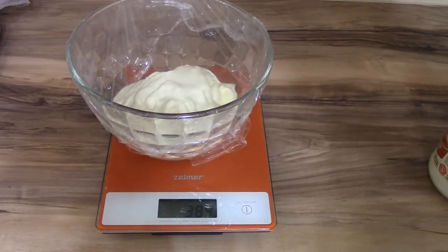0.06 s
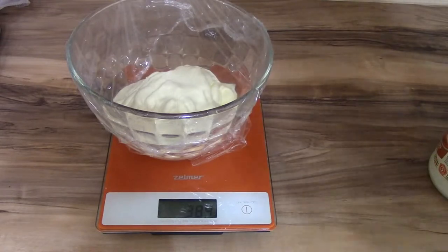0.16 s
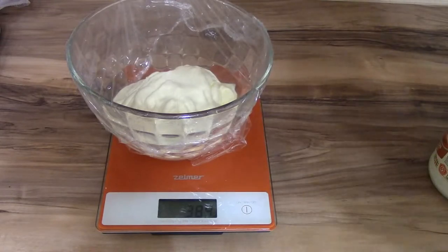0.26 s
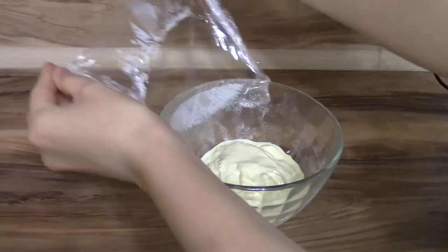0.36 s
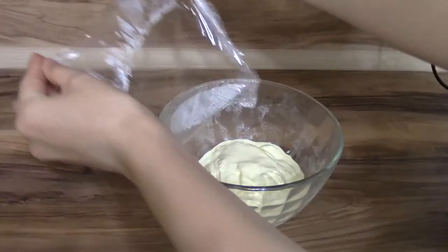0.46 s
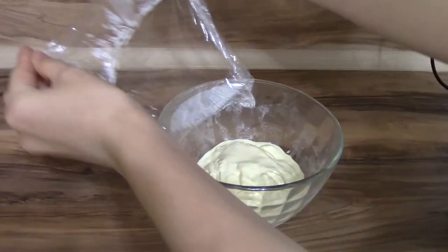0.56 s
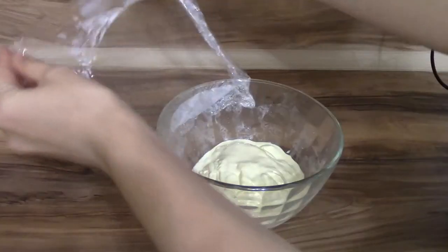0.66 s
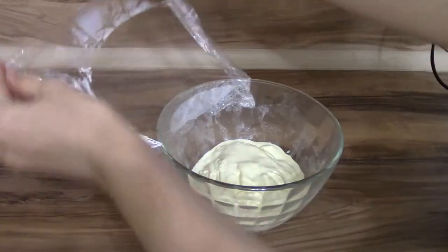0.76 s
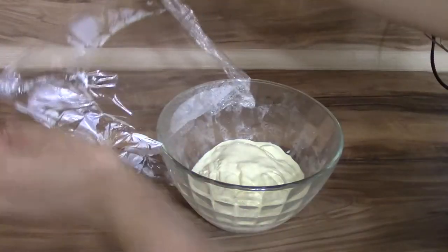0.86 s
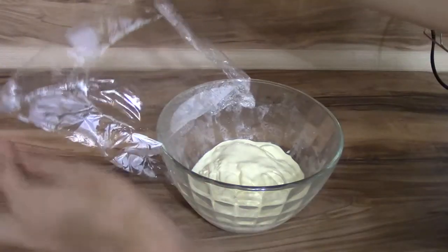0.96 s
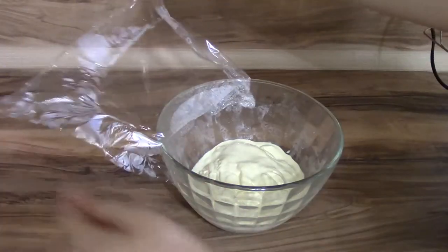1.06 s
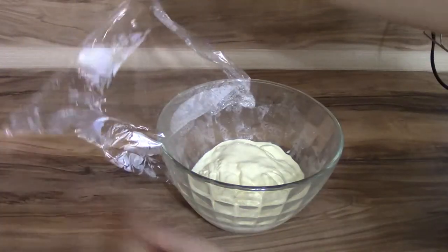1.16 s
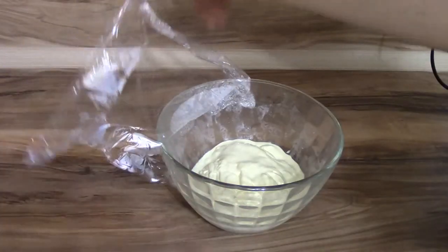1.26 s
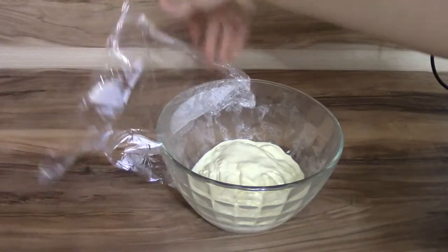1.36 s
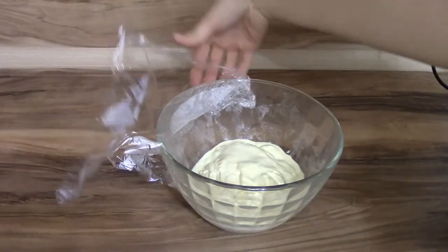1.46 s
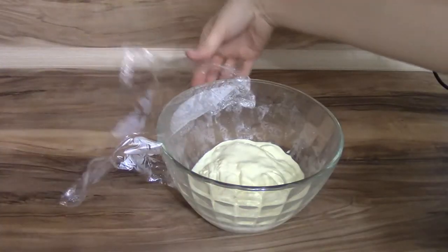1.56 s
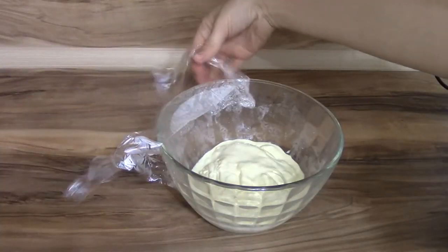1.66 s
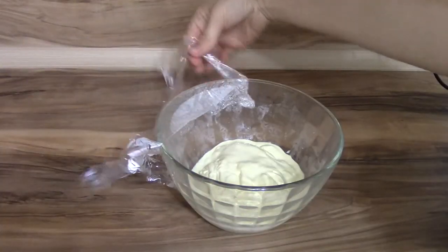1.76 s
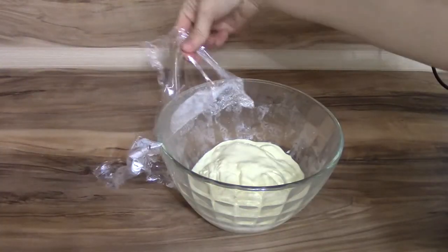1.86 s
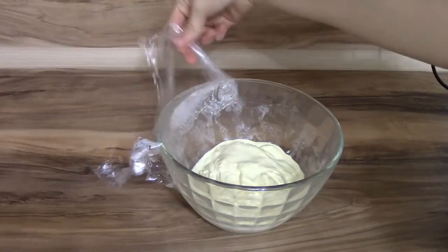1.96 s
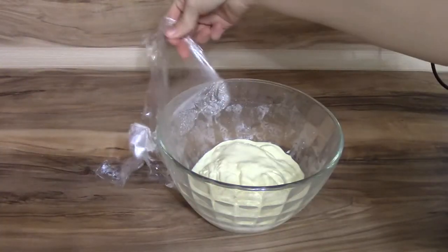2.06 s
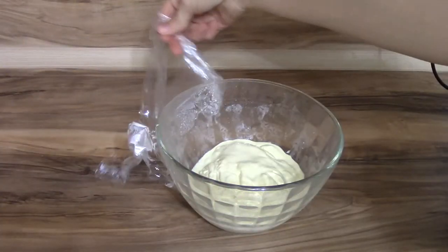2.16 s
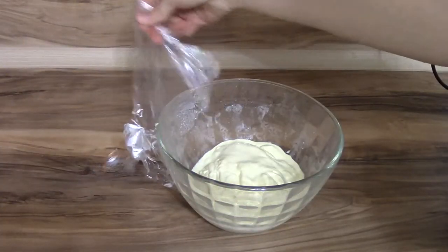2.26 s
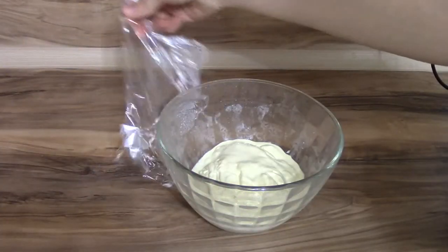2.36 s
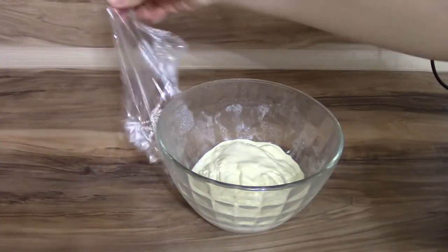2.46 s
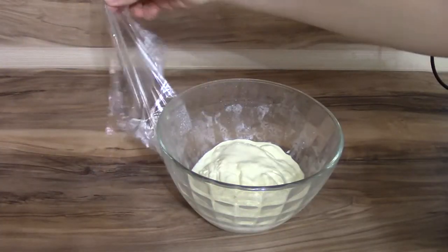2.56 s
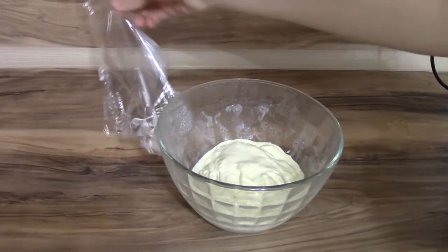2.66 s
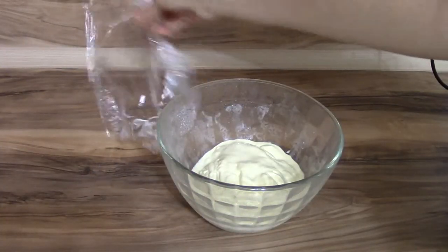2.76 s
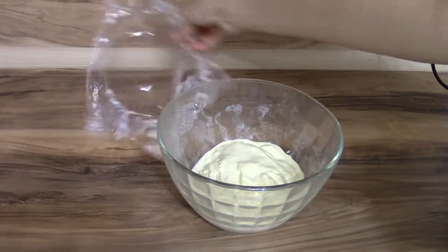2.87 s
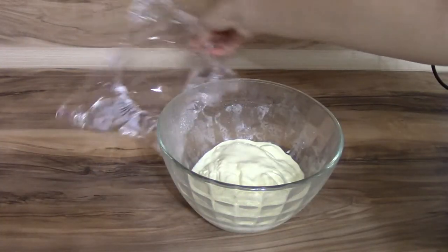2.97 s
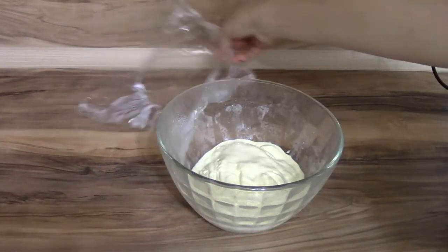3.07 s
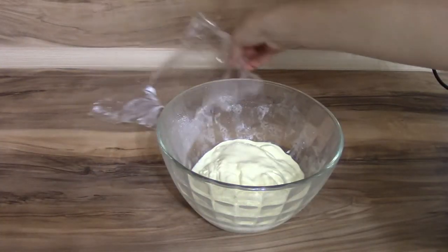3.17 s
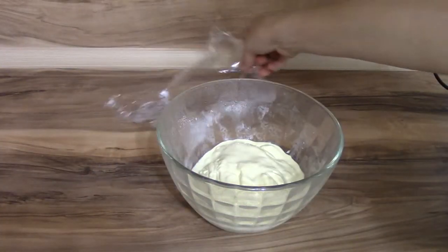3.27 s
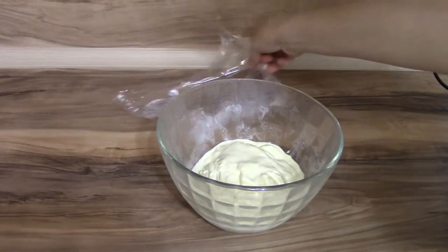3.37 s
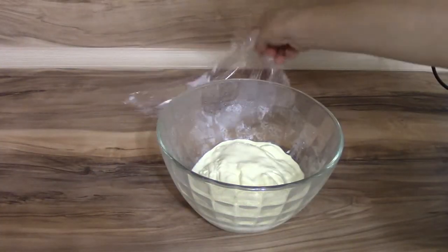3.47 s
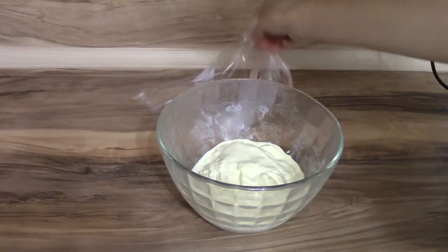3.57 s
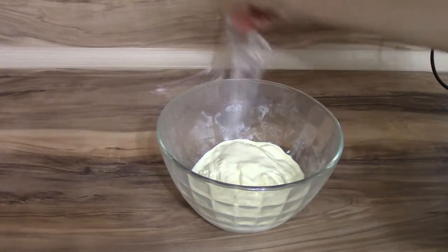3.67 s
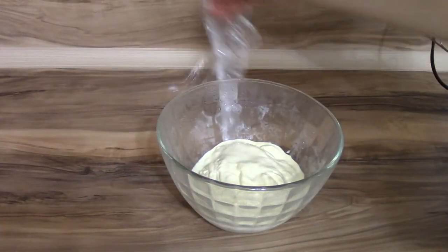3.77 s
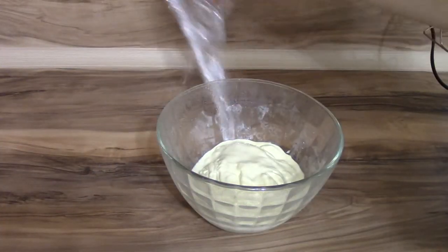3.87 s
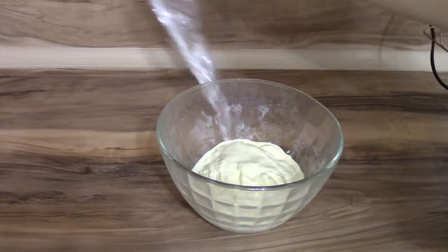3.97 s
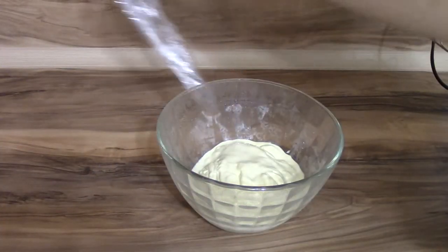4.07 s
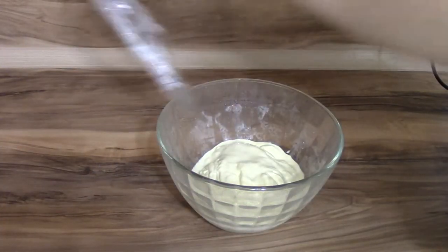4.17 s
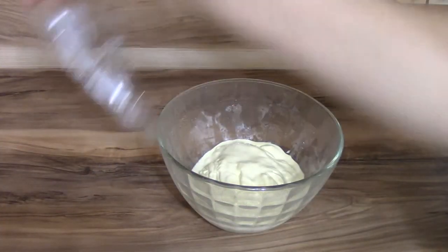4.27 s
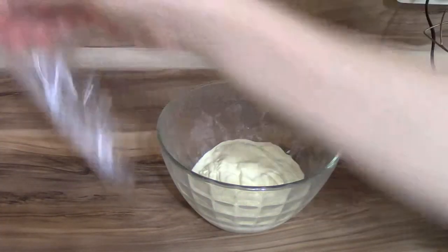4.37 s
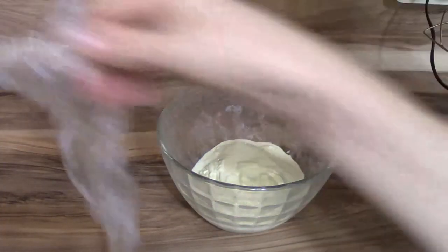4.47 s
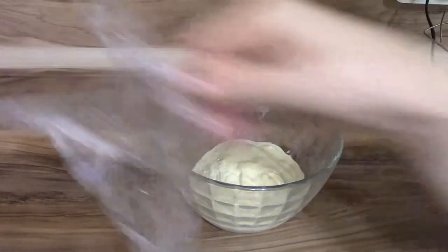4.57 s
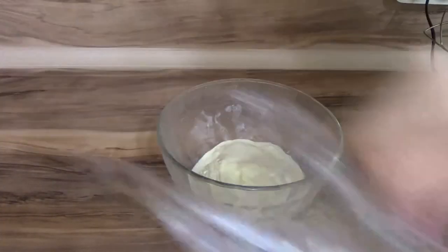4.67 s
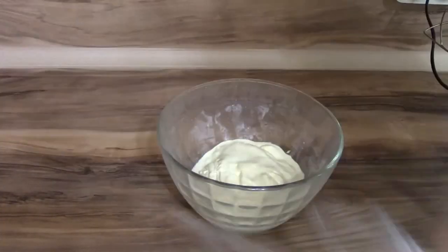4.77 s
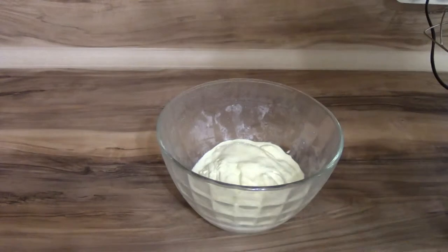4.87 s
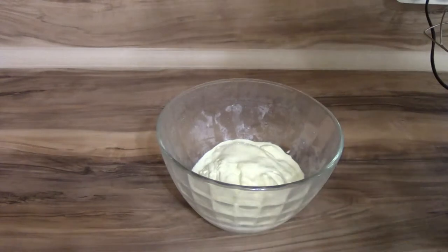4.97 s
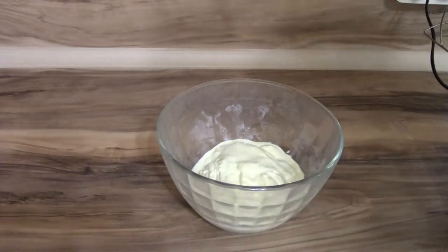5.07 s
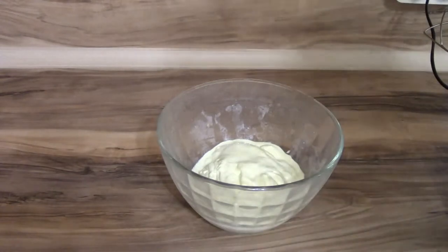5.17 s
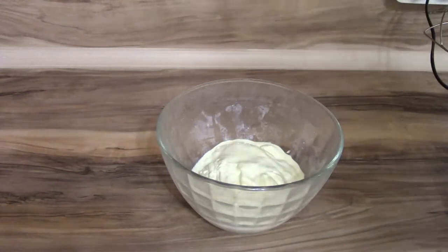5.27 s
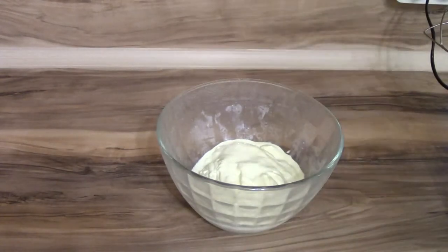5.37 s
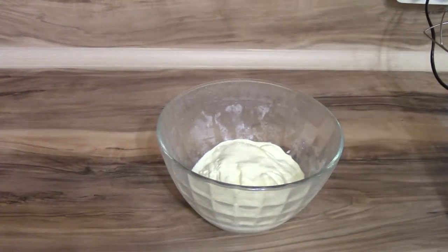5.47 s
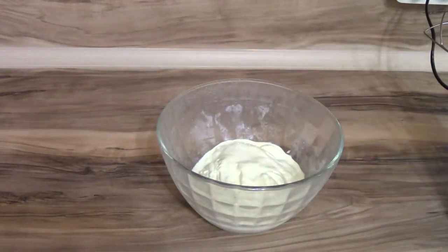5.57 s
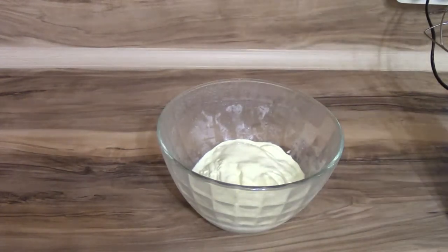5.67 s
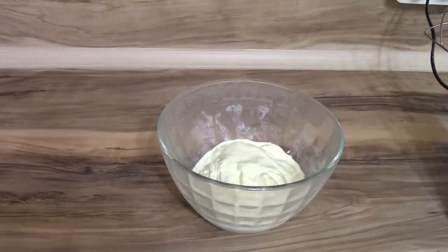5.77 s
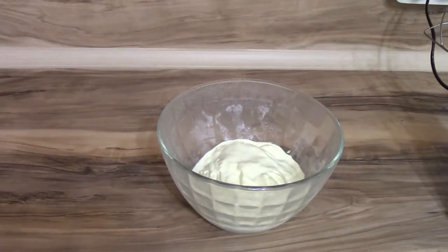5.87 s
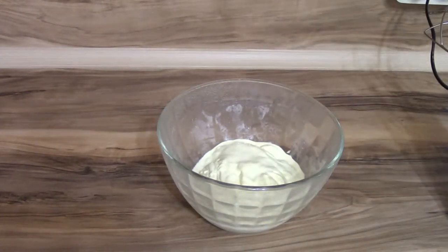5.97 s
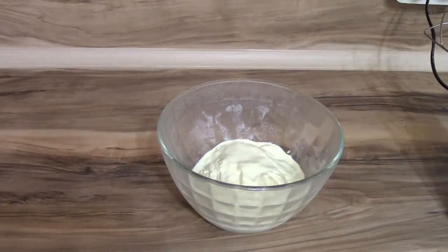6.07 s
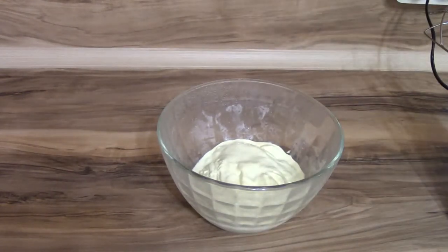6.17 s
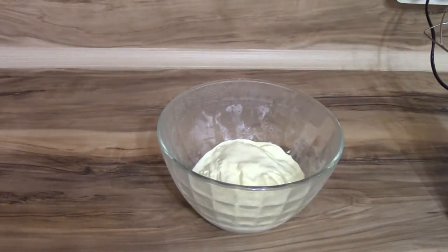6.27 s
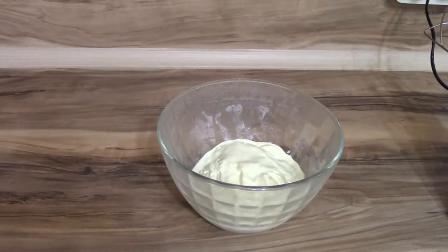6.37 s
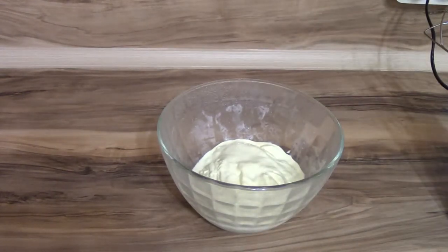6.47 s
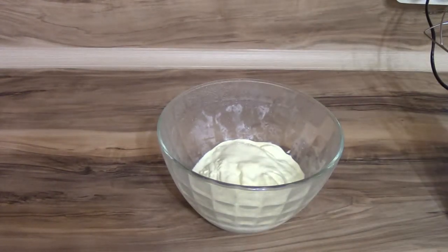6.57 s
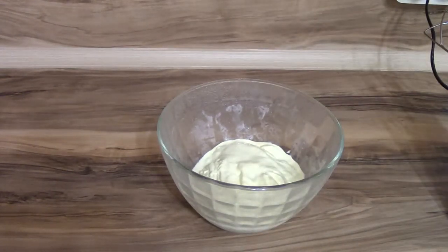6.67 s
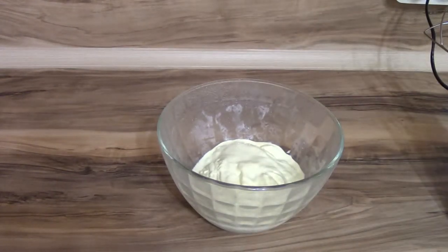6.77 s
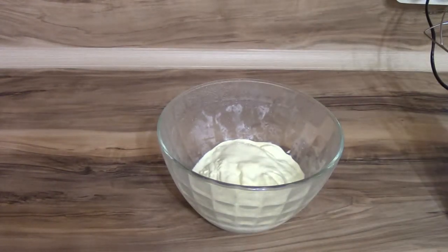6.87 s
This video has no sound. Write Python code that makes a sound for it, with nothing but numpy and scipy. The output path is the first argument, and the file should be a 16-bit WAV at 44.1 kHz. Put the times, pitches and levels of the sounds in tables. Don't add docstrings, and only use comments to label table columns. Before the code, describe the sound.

Thin plastic film is peeled off a glass bowl in bright crinkles and sharp snaps, then rustles away over a faint kitchen hum.

```python
import sys
import numpy as np
from scipy import signal
from scipy.fft import rfft, irfft, next_fast_len
from scipy.io import wavfile
from scipy.ndimage import uniform_filter1d

SR = 44100
rng = np.random.default_rng(int(sys.argv[2]) if len(sys.argv) > 2 else 0)


def unload_audio(sound):
    columns = np.transpose(np.atleast_2d(sound))
    steps = np.round(np.clip(columns, -1, 1) * 32767)
    wavfile.write(sys.argv[1], SR, steps.astype(np.int16))


def undo_db(level):
    steps = np.asarray(level, float) / 20
    return 10 ** steps


N = 305210
MOVE_S = .365


def at_hz(points, hz):
    table_hz, db = np.transpose(points)
    return np.interp(np.log(hz), np.log(table_hz), db)


def in_time(rows):
    s, *columns = np.transpose(rows)
    return [np.interp(np.arange(N) / SR, s, column) for column in columns]


def rms_one(x):
    return x / np.sqrt(np.mean(x ** 2) + 1e-20)


def drift(rate):
    r = np.exp(-80 * np.pi * rate / SR)
    noise = rng.standard_normal(N // 40 + 2002)
    slow = signal.lfilter([1], [1, -2 * r, r * r], noise)[2000:]
    return np.interp(np.arange(N) / 40, np.arange(len(slow)), rms_one(slow))


def coloured(x, spectrum):
    size = next_fast_len(N)
    hz = np.maximum(np.arange(size // 2 + 1) * SR / size, 1)
    return irfft(rfft(x, size) * undo_db(at_hz(spectrum, hz)), size)[:N]


def ring(clicks, hz, t60):
    r, w = undo_db(-60 / (t60 * SR)), 2 * np.pi * hz / SR
    return signal.lfilter([0, np.sin(w)], [1, -2 * r * np.cos(w), r * r], clicks + 1e-18)


def band(x, low_hz, high_hz):
    return signal.sosfilt(signal.butter(2, [low_hz, high_hz], "band", fs=SR, output="sos"), x)


def film():
    # f/Hz, level/dB per Hz
    film_colour = [(200, -30), (330, -8.5), (480, -5.5), (1000, -4.5), (1400, 0), (1950, -7), (2900, -2),
                   (3700, -2), (4300, -5.5), (6000, 0), (7500, -4.5), (9500, -.5), (12500, -6),
                   (15700, -16)]
    crinkle_db, slack_db, taut_db = pull()
    buckling = creases(2800, spread_db=2.9, clump_db=2.0, burst_s=.0009)
    buckling = buckling * (np.arange(N) > MOVE_S * SR)
    folds = snaps()
    edges = 260 * 2 ** (np.arange(19) / 3)
    white = rng.standard_normal((2, N))
    chances = rng.standard_normal((len(folds), 18))
    out = np.zeros(N)
    for k, (low, high) in enumerate(zip(edges, edges[1:])):
        hz = np.sqrt(low * high)
        lowness = np.clip(np.log2(5200 / hz), 0, 1)
        highness = np.clip(np.log2(hz / 7000) / .6, 0, 1)
        tilt_db = lowness * (slack_db + 4.0) + highness * (taut_db + 3.5)
        patches_db = 1.5 * drift(12)
        shake = buckling * undo_db(crinkle_db + tilt_db + patches_db)
        for (s, peak_db, flap_db, tight_db, t60), chance in zip(folds, chances):
            at = round(s * SR)
            band_t60 = max(t60, .003) * (4000 / hz) ** 0.1
            fall = undo_db(-60 * np.arange(1200) / SR / band_t60)
            fold_db = peak_db + lowness * (flap_db + 7.5) + highness * (tight_db + 11.0)
            size = undo_db(fold_db + 2.0 * chance[k] - 3.5)
            rattle = undo_db(-9.5) * size * fall[:N - at]
            shake[at:at + 1200] = np.hypot(shake[at:at + 1200], rattle)
        out += band(white[k % 2] * shake, low, high)
    return undo_db(6.5) * coloured(out + flips(folds), film_colour)


def pull():
    # t/s, crinkle level/dB,
    # slackness/dB that lets the low flap sound, tautness/dB that sharpens the top
    handling = [(.366, -56, 2, 1), (.373, -42, 1, 0), (.726, -43, -5, -1), (.748, -51, -4, 1),
                (1.0, -63, -8, -2.5), (1.47, -68, 5, -4), (1.71, -56, 3, -2), (1.76, -43.5, -5, -1.5),
                (2.06, -44, -1, -5), (2.25, -49, 2, -2), (2.6, -54, -4, -2), (2.9, -55, 1, -4),
                (3.345, -47, 3, -1), (3.39, -54, 0, -3), (4.9, -59, 0, -4), (5.3, -52, 1, -5),
                (5.47, -60.5, 4, -4), (6.92, -78, 10, -14)]
    # peak t/s, peak level/dB, 10 dB rise/s, 10 dB fall/s, tautness/dB
    peel_tugs = [(.578, -35.5, .07, .06, 1), (.69, -35.5, .04, .015, -2), (.726, -40, .03, .015, -6),
                 (1.17, -56, .12, .12, -3), (1.169, -50, .006, .025, -6), (1.548, -51, .02, .03, -8),
                 (1.8445, -35.5, .002, .08, 0), (1.932, -37.5, .004, .06, 1), (1.968, -34, .001, .012, 3),
                 (1.999, -36.5, .004, .11, -2), (2.35, -39.5, .09, .04, -2), (2.478, -35, .12, .075, -4.5),
                 (2.71, -48, .15, .03, -3), (2.719, -41, .001, .03, -12), (2.729, -36, .004, .022, -9),
                 (2.925, -42.5, .06, .09, 1), (3.003, -38.5, .001, .08, 0), (3.0995, -34, .001, .012, -1),
                 (3.105, -39.5, .002, .08, 1.5), (3.185, -38.5, .06, .009, -3.5),
                 (3.217, -34, .001, .07, -.5), (3.295, -34.5, .05, .03, -1), (3.342, -40, .07, .011, 9)]
    # peak t/s, peak level/dB, 10 dB rise/s, 10 dB fall/s, slackness/dB
    loose_rustles = [(3.678, -48, .07, .045, -8), (3.986, -47, .001, .06, -6), (4.111, -47, .002, .012, -9),
                     (4.29, -55, .04, .06, -3), (4.597, -49.5, .008, .03, 0), (4.68, -54, .1, .04, 1),
                     (4.645, -54, .03, .02, -10), (4.82, -55, .02, .08, -12), (4.95, -45, .003, .07, -2),
                     (4.981, -46, .015, .03, 2), (5.07, -52, .03, .05, 2), (5.26, -50, .03, .06, -2),
                     (5.355, -44.5, .035, .025, -4), (5.429, -49, .022, .02, -3.5),
                     (5.85, -57, .025, .025, 0), (5.941, -48, .004, .02, -20), (5.96, -55, .01, .06, -2),
                     (6.355, -62, .1, .05, 0), (6.561, -63, .035, .08, 3), (6.885, -60.5, .08, .02, 5)]
    peel_slack_db, loose_taut_db = -3.5, -6.0
    t = np.arange(0, N, 16) / SR
    s, *columns = np.transpose(handling)
    crinkle_db, slack_db, taut_db = (np.interp(t, s, column) for column in columns)
    mid = undo_db(2 * crinkle_db)
    low, high = mid * undo_db(2 * slack_db), mid * undo_db(2 * taut_db)
    tugs = [(*row[:4], peel_slack_db, row[4]) for row in peel_tugs]
    tugs += [(*row, loose_taut_db) for row in loose_rustles]
    for peak_s, db, rise_s, fall_s, slack, taut in tugs:
        away = np.maximum((peak_s - t) / rise_s, (t - peak_s) / fall_s)
        power = undo_db(2 * (db - 10 * away))
        mid = mid + power
        low = low + power * undo_db(2 * slack)
        high = high + power * undo_db(2 * taut)
    return [np.interp(np.arange(N) / SR, t, 10 * np.log10(p)) for p in (mid, low / mid, high / mid)]


def creases(per_s, spread_db, clump_db, burst_s):
    born = rng.random(N) < per_s * undo_db(clump_db * drift(25)) / SR
    sizes = undo_db(spread_db * np.minimum(rng.exponential(1, N), 4))
    r = np.exp(-1 / (burst_s * SR))
    power = signal.lfilter([1], [1, -r * r], born * sizes ** 2)
    return np.sqrt(power / uniform_filter1d(power + 1e-9, size=6000))


def snaps():
    # t/s, peak level/dB, low flap/dB, tautness/dB
    peel_snaps = [(.379, -25, -3, -9), (.4854, -22, -14, -20), (.6578, -22, -20, -8),
                  (.6872, -16, -14, -16), (.6966, -20, -12, -13), (.7257, -14, -24, -9),
                  (1.169, -31, -3.5, -19), (1.547, -40, 3, -10), (1.8055, -20, -4, -14),
                  (1.844, -15, -8, -10), (1.853, -17, -6, -13), (1.932, -18, -14, -11),
                  (1.939, -21, -9, -10), (1.9561, -19, -6, -9), (1.9682, -10, 2, -11),
                  (1.9989, -18, -1, -8), (2.3405, -24, 2, -16), (2.4455, -20, -12, -11),
                  (2.4815, -17, -1, -17), (2.5626, -19, -5, -9), (2.6545, -28, -10, -15),
                  (2.7237, -16, -14, -16), (2.7275, -4, -13, -21), (2.7302, -10, -20, -17),
                  (3.0028, -20, -4, -11), (3.0995, -19, -8, -14), (3.1394, -20, -11, -10),
                  (3.1944, -21, -4, -12), (3.3045, -15, -17, -11), (3.3425, -17, -5, -12)]
    # t/s, peak level/dB
    peel_ticks = [(.371, -26), (.5224, -25), (.5716, -23), (.8824, -33), (.9398, -35), (1.0217, -39),
                  (1.1268, -35), (1.2238, -33), (1.7489, -27), (1.878, -19), (1.8924, -24), (2.1405, -25),
                  (2.404, -22), (2.5452, -22), (2.7189, -19), (2.974, -29), (3.1614, -17), (3.1744, -25),
                  (3.2171, -20), (3.2771, -27), (3.324, -22), (3.3314, -24)]
    # t/s, peak level/dB, low flap/dB, tautness/dB
    loose_snaps = [(.8501, -36, -21, -3), (.8724, -31, -21, -3), (3.6735, -27, -13, -19),
                   (3.7206, -33, 2, -17), (3.749, -32, .5, -16), (3.8233, -28, -5, -7),
                   (3.8408, -31, -8, -16), (3.8932, -32, -20, -3), (3.915, -35, -18, -8),
                   (3.937, -30, -16, -6), (3.9488, -34, -15, -3), (3.9868, -27, -14, -5),
                   (3.9936, -23, -6, -8), (4.0851, -33, -13, -12), (4.111, -20, -14, -19),
                   (4.2668, -29, -16, -13), (4.3294, -32, -12, -10), (4.5945, -32, -23, -7),
                   (4.6864, -34, -14, -8), (4.816, -32, -15, -8), (4.9496, -30, -12, -17),
                   (4.9759, -24, -2, -14), (5.1077, -29, -7, -13), (5.1419, -36, -4, -13),
                   (5.1794, -33, -8, -17), (5.3512, -26, -7, -11), (5.4293, -34, 1, -18),
                   (5.942, -34, -9, -13)]
    tick_flap_db, tick_taut_db = -17.0, -12.0
    snap_t60_s, hard_snap_db, hard_snap_t60_s = .012, -10.0, .0073
    rows = list(peel_snaps)
    rows += [(*row, tick_flap_db, tick_taut_db) for row in peel_ticks]
    rows += list(loose_snaps)
    return [(*row, hard_snap_t60_s if row[1] > hard_snap_db else snap_t60_s) for row in rows]


def flips(folds):
    s, peak_db, flap_db, tight_db, _ = np.transpose(folds)
    chance = rng.standard_normal((len(s), 3))
    parts = [(800, 3600, flap_db + 7.5), (3600, 8000, 0), (8000, 16500, tight_db + 7.5)]
    out = 0
    for k, (low, high, tilt_db) in enumerate(parts):
        clicks = np.zeros(N)
        clicks[np.round(s * SR).astype(int)] = undo_db(peak_db + tilt_db + 1.5 * chance[:, k] + 1.5)
        out = out + band(clicks + 1e-18, low, high)
    return out


def pops():
    # t/s, peak level/dB, f/Hz
    bright_pops = [(0.3815, -30.0, 9100), (0.4759, -30.0, 9600), (0.4774, -30.0, 9200),
                   (0.4891, -30.0, 10200), (0.5227, -26.0, 9500), (0.5765, -25.0, 9000),
                   (0.6285, -28.0, 11800), (0.6583, -23.0, 9400), (0.6877, -21.0, 9100),
                   (0.6892, -23.0, 9500), (0.8134, -39.0, 10300), (0.8517, -35.0, 10200),
                   (0.8797, -39.0, 9800), (0.8833, -39.0, 10700), (0.9031, -44.0, 5600),
                   (0.9411, -40.0, 6300), (1.3073, -44.0, 9000), (1.3348, -47.0, 11100),
                   (1.8074, -28.0, 10000), (1.8445, -24.0, 11900), (1.9108, -29.0, 9900),
                   (1.9149, -29.0, 9200), (1.9695, -18.0, 11500), (2.4024, -29.0, 10200),
                   (2.4186, -28.0, 10300), (2.5454, -29.0, 9000), (2.5612, -28.0, 8700),
                   (2.5658, -30.0, 9300), (2.5677, -32.0, 5600), (2.6344, -36.0, 9500),
                   (2.6569, -34.0, 8100), (2.6678, -34.0, 9000), (2.719, -27.0, 6100),
                   (2.8901, -37.0, 10700), (2.976, -32.0, 9000), (3.0696, -32.0, 9800),
                   (3.1015, -26.0, 10200), (3.176, -27.0, 9600), (3.217, -29.0, 6300),
                   (3.9871, -28.0, 10900), (4.1172, -39.0, 8700), (4.3358, -42.0, 7800),
                   (4.3899, -44.0, 5000), (4.5117, -44.0, 10900), (4.5939, -32.0, 8400),
                   (4.5957, -32.0, 9200), (4.6005, -34.0, 8600), (4.6263, -42.0, 9400),
                   (4.6357, -42.0, 8700), (4.651, -41.0, 9500), (4.6561, -41.0, 7800),
                   (4.7731, -44.0, 7900), (4.8285, -40.0, 7500), (4.9573, -37.0, 8400),
                   (5.1831, -41.0, 6100), (5.2475, -39.0, 7000), (5.353, -36.0, 5300),
                   (5.5705, -45.0, 7500)]
    # t/s, peak level/dB, f/Hz
    dull_pops = [(0.4212, -33.0, 2500), (0.6988, -28.0, 4800), (1.1693, -40.0, 3100), (1.3072, -45.0, 2500),
                 (1.5521, -40.0, 2700), (1.7586, -36.0, 3400), (1.7644, -37.0, 3300), (1.8492, -30.0, 1500),
                 (1.8787, -32.0, 4600), (1.9381, -28.0, 2900), (1.9728, -28.0, 2100), (1.9982, -25.0, 1900),
                 (2.0143, -30.0, 2800), (2.1434, -33.0, 3100), (2.214, -35.0, 1700), (2.4507, -30.0, 4700),
                 (2.4643, -29.0, 4300), (2.4821, -25.0, 3400), (2.6715, -37.0, 3300), (2.7276, -20.0, 2900),
                 (2.9772, -39.0, 2800), (3.1014, -27.0, 3700), (3.196, -29.0, 3100), (3.9945, -33.0, 3200),
                 (4.0509, -43.0, 3300), (5.1088, -39.0, 3300), (5.1806, -41.0, 2400), (5.1823, -41.0, 2700),
                 (5.3516, -34.0, 3300), (5.4931, -40.0, 2100)]
    # t/s, peak level/dB, f/Hz
    rim_slips = [(3.3048, -25.0, 8200), (3.3063, -22.0, 7800), (3.3091, -26.0, 9900),
                 (3.3118, -21.0, 11300), (3.3148, -21.0, 10600), (3.3163, -22.0, 11100),
                 (3.3222, -25.0, 10500), (3.3237, -21.0, 10800), (3.3259, -24.0, 10700),
                 (3.3272, -20.0, 10900), (3.329, -22.0, 9800), (3.3305, -22.0, 12200),
                 (3.3322, -21.0, 12400), (3.3343, -19.0, 12100), (3.3363, -21.0, 10500),
                 (3.3376, -16.0, 11600), (3.3436, -19.0, 10900)]
    cycles, partner_ratio, gain_db = 24.0, 1.13, 1.5
    rows = [*bright_pops, *dull_pops, *rim_slips]
    click = np.eye(1, 400)[0]
    out = np.zeros(N + 400)
    for (s, peak_db, hz), (sign, share) in zip(rows, rng.random((len(rows), 2))):
        partner_hz = hz * partner_ratio ** np.sign(share - .5)
        body = ring(click, hz, cycles / hz) + .6 * ring(click, partner_hz, cycles / hz)
        body = band(body, .8 * hz, 1.25 * hz)
        pop = undo_db(peak_db + gain_db) * body / np.abs(body).max()
        out[round(s * SR) - 6:][:400] += np.sign(sign - .5) * pop
    return out[:N]


def taps():
    # t/s, peak level/dB, f/Hz, t60/s
    tap_rows = [(.69, -36, 557, 0.11), (1.539, -41, 996, .08), (1.545, -39, 1000, .06),
                (1.552, -39, 1250, .05), (1.845, -34, 880, .06), (1.97, -37, 920, .05),
                (2.47, -37, 450, 0.09), (2.729, -33, 361, 0.05), (2.729, -31, 440, .05),
                (4.1105, -35, 4200, .008), (2.728, -37, 1350, .03), (2.745, -38, 1240, .08),
                (1.9677, -27, 1560, 0.025), (1.97, -53.5, 163, 0.23), (5.11, -45, 594, .05),
                (5.43, -44, 700, .04), (5.515, -44, 550, .06), (3.335, -33, 484, 0.067),
                (3.13, -41, 400, .12), (3.31, -33, 520, .05), (3.54, -39.5, 1010, 0.067),
                (3.721, -47, 355, 0.13), (3.749, -48, 398, 0.07), (5.546, -38.5, 907, 0.06),
                (5.688, -45, 560, .04), (5.69, -40.5, 800, 0.045), (5.83, -41.5, 940, .06),
                (6.864, -50, 1100, .05)]
    out = np.zeros(N)
    for s, peak_db, hz, t60 in tap_rows:
        at = round(s * SR)
        puff = rng.standard_normal(6000) * undo_db(-60 * np.arange(6000) / SR / 0.0074)
        body = ring(puff, hz, t60) + ring(puff, 1.17 * hz, .6 * t60)
        body = body + .6 * ring(puff, 1.45 * hz, .4 * t60)
        body = band(body, .7 * hz, 2.2 * hz)
        out[at:at + 6000] += (undo_db(peak_db) * body / np.abs(body).max())[:N - at]
    return out


def glass_pings():
    # t/s, peak level/dB, contact/s, time until the hand damps them/s, level lost then/dB
    low_knock = (4.592, -31.5, .001, .012, -9)
    high_knock = (4.7283, -33, .0015, .011, -15)
    # f/Hz, level/dB, t60/s
    low_modes = [(797, -16, .3), (1346, -11, .2), (1491, -2, .25), (1803, 0, .22), (1950, -10, .04),
                 (2750, -15, .06)]
    high_modes = [(1850, -13, .1), (2690, -9, .3), (2715, -1.5, .45), (2790, -14, .2), (3000, -7, .05),
                  (3150, -9, .1), (3400, -12, .05)]
    return ping(low_knock, low_modes) + ping(high_knock, high_modes)


def ping(strike, modes):
    s, peak_db, contact_s, free_s, damped_db = strike
    t = np.maximum(np.arange(N) / SR - s, 0)
    swell = (1 - np.exp(-t / contact_s)) * undo_db(damped_db * np.clip((t - free_s) / .004, 0, 1))
    out = np.zeros(N)
    for hz, db, t60 in modes:
        waver = undo_db(5.0 * drift(110) * (t > free_s))
        out += undo_db(peak_db + db - 60 * t / t60) * swell * waver * np.sin(2 * np.pi * hz * t)
    return out


def kitchen(x):
    t60_s, wall_cut_hz, first_wall_s = .26, 9000, .004
    t = np.arange(SR // 2) / SR
    low, high = rng.standard_normal((2, SR // 2))
    low = signal.sosfilt(signal.butter(1, wall_cut_hz, fs=SR, output="sos"), low)
    high = signal.sosfilt(signal.butter(1, wall_cut_hz, "high", fs=SR, output="sos"), high)
    tail = low * undo_db(-60 * t / t60_s) + high * undo_db(-120 * t / t60_s)
    tail = band(tail, 250, 17000) * np.clip(t / first_wall_s - 1, 0, 1)
    return signal.fftconvolve(x, tail / np.sqrt(np.sum(tail ** 2)))[:N]


def hum(hum_db):
    # multiple of the turning rate, rms level/dB
    motor_lines = [(4, -86), (5, -80), (6, -72), (7, -61.5), (8, -69.5), (9, -68.5), (10, -77.5), (11, -80),
                   (12, -71.5), (13, -91), (20, -84)]
    motor_hz = 49.4
    turns = np.cumsum(motor_hz * (1 + 0.00205 * drift(1))) / SR
    out = np.zeros(N)
    for k, db in motor_lines:
        out += undo_db(db + 1.5 * drift(4)) * np.sin(2 * np.pi * (k * turns + rng.random()))
    return np.sqrt(2) * undo_db(hum_db) * out


def air(air_db):
    # f/Hz, level/dB per Hz
    early_colour = [(59, -76), (100, -46), (250, -17), (340, -12), (450, -18), (578, -16.5), (845, -18),
                    (959, -15), (1630, -21), (3480, -25), (15600, -42.5)]
    # f/Hz, level/dB per Hz
    late_colour = [(100, -21), (150, -14.5), (260, -12), (340, -5.5), (600, -7), (1000, -8.5), (1400, -9.5),
                   (2100, -11), (3200, -8), (3650, -11.5), (4100, -15), (7000, -20), (12500, -28),
                   (15700, -32)]
    early = undo_db(-61.5) * rms_one(coloured(rng.standard_normal(N), early_colour))
    late = undo_db(-55.5) * rms_one(coloured(rng.standard_normal(N), late_colour))
    return undo_db(air_db) * np.where(np.arange(N) < MOVE_S * SR, early, late)


def scene():
    # t/s, hum level/dB, air level/dB
    motor_load = [
        (0, 2, 7.5),
        (.36, 4, 5),
        (.37, 1, 5.5),
        (1.4, 2, 1.5),
        (2.5, 2.5, 4.5),
        (4, 2, 3.5),
        (4.5, 1, 1.5),
        (5.5, -3, 4.5),
        (6.92, 1.5, 1),
    ]
    hum_db, air_db = in_time(motor_load)
    near = film() + pops() + taps()
    pings = glass_pings()
    echoes = undo_db(-8.5) * kitchen(near + .3 * pings)
    return (near + pings + echoes + hum(hum_db) + air(air_db))[None, :]


def band_limit(x):
    return signal.sosfilt(signal.butter(12, 16510, fs=SR, output="sos"), x)


def record(dry):
    mic = signal.sosfilt(signal.butter(2, 172, "high", fs=SR, output="sos"), dry)
    circuit = signal.lfilter([.015], [1, -.985], rng.standard_normal(dry.shape))
    mix = mic + undo_db(-60) * circuit
    return band_limit(mix)


dry = scene()
out = record(dry)
unload_audio(out)
```